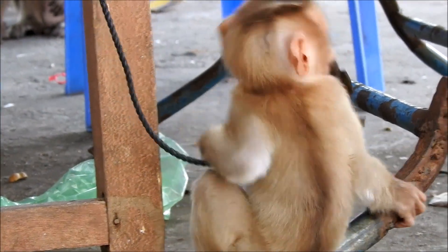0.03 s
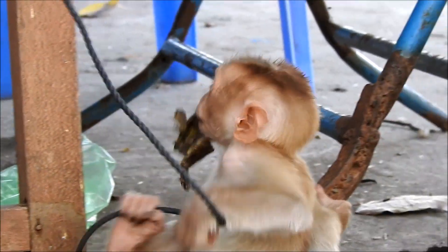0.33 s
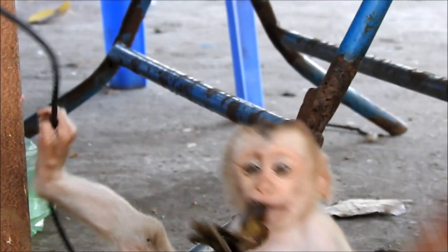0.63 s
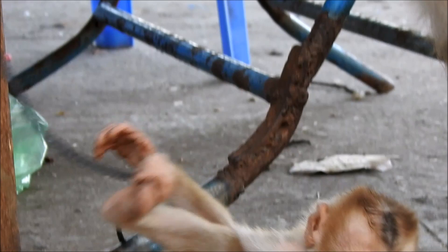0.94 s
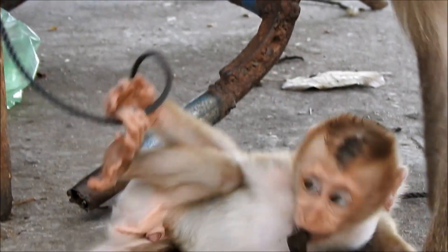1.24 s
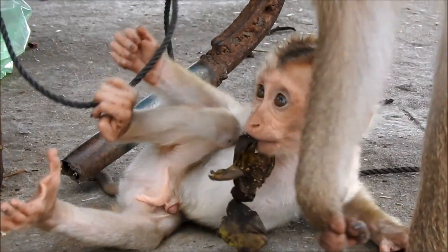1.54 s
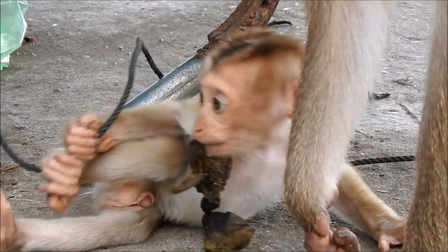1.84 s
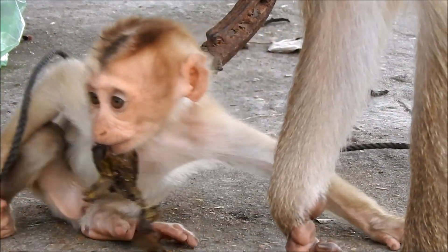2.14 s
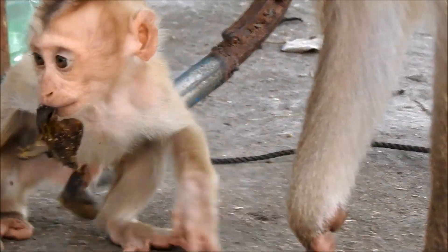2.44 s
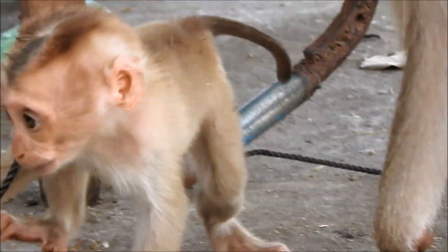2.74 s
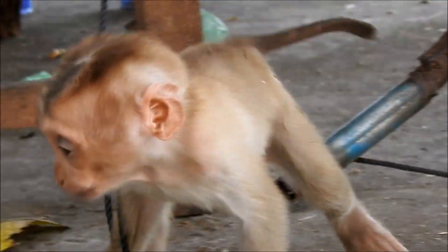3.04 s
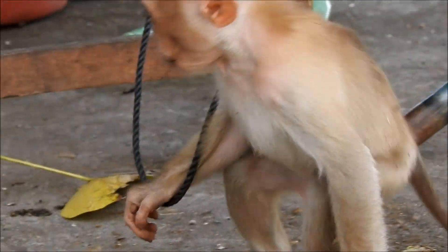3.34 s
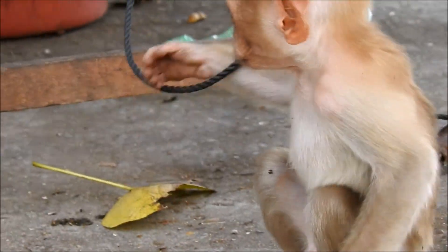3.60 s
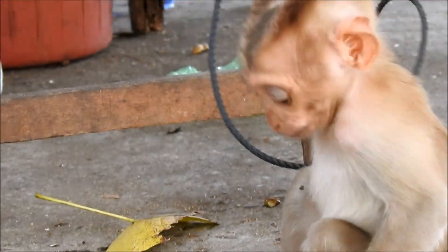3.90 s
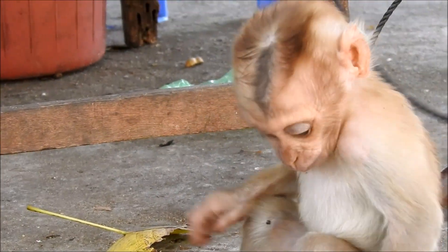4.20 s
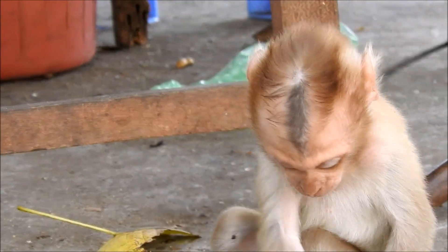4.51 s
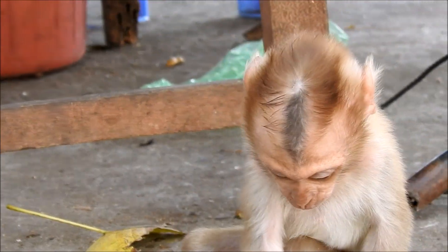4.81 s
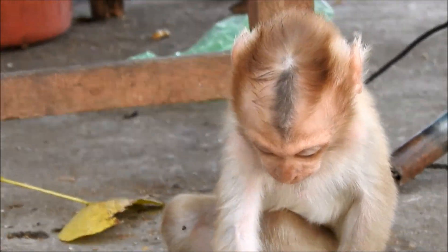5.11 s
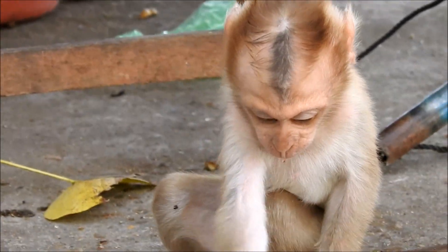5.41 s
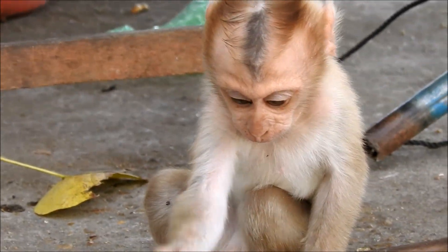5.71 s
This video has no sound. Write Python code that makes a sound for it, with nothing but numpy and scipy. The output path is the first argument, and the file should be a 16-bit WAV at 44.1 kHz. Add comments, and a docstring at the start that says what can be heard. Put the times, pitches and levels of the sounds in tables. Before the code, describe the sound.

Soft bumps, scuffs and ticks in a quiet, hissing yard, with a groaning rub on something hollow and a sharp knock near the end.

```python
"""A quiet yard with a steady high hiss, where a young monkey tumbles with a rope on a concrete floor.
Its contacts make soft bumps, scuffs, clicks and ticks; the rope swishes and grit snaps.
A hollow shell close to the microphone is rubbed: friction rasps, stick-slip groans near 300 Hz.
Late on comes one sharp knock. Sources are built as (mid, side) pairs, then turned to left and right."""
import sys
import numpy as np
from scipy import signal
from scipy.fft import rfft, irfft
from scipy.io import wavfile
from scipy.ndimage import uniform_filter1d

SR = 44100
rng = np.random.default_rng(int(sys.argv[2]) if len(sys.argv) > 2 else 0)


def store_pcm(level_fs):
    """Save levels as 16-bit WAV."""
    pcm = np.round(np.clip(level_fs, -1, 1) * 32767).astype(np.int16)
    wavfile.write(sys.argv[1], SR, np.atleast_2d(pcm).T)


N = 253575
TIME_S = np.arange(N) / SR
FREQ_HZ = np.arange(N // 2 + 1) * SR / N
MID_ONLY = np.array([[1], [0]])

# Levels are relative, ahead of each source's gains.
# soft contacts (time [s], level [dB], pitch [Hz])
BUMP_HITS = [(0.242, -48, 137), (0.634, -43, 179), (1.02, -48.5, 172), (2.251, -37.5, 306),
             (2.363, -37, 285), (2.749, -36.5, 308), (2.984, -34.5, 186), (2.997, -45, 273),
             (3.033, -35.5, 294), (3.318, -41.5, 222), (3.42, -36, 239), (3.442, -38, 323),
             (3.496, -46.5, 209), (3.847, -48, 291), (4.493, -33.5, 249), (4.554, -40.5, 337),
             (5.047, -39.5, 196), (5.071, -41.5, 220)]
# short slides (time [s], length [s], rasp [dB], grit [dB], grit pitch [Hz])
SCUFF_SLIDES = [(0.347, 0.1, -60, -60, 4960), (0.612, .02, -57, -64, 5000),
                (0.635, 0.019, -62, -49.5, 5100), (0.868, .04, -58.5, -66, 5000),
                (2.53, 0.01, -48, -39, 5000), (2.54, 0.043, -52, -36.5, 5700),
                (2.579, 0.021, -63, -47, 6200), (2.595, 0.017, -51.5, -42, 5000),
                (2.713, 0.043, -59, -50.5, 5400), (3.011, 0.07, -73, -50.5, 6800),
                (3.242, 0.048, -60, -49, 5550), (3.418, 0.13, -53.5, -56, 6960),
                (3.834, 0.068, -59, -56, 6200), (4.482, 0.02, -35.5, -40.5, 5500),
                (4.517, 0.011, -44, -43, 5500), (5.02, 0.02, -61, -48, 2990),
                (5.296, 0.021, -54.5, -51.5, 2300)]
# rope passes (time [s], length [s], level [dB])
ROPE_PASSES = [(0.661, 0.068, -49), (2.467, 0.017, -47.5), (2.98, 0.044, -47), (3.415, 0.052, -49),
               (3.804, .06, -55.5), (4.012, 0.041, -48), (4.498, 0.033, -46), (4.54, .026, -52),
               (5.287, .018, -57)]
# hard contacts (time [s], body [dB], edge [dB], pitch [Hz])
CLICK_HITS = [(0.793, -45, -44.5, 1470), (1.606, -47, -58, 1450), (1.63, -42, -48, 1900),
              (1.96, -26, -50, 1095), (1.962, -27, -52, 624), (1.977, -35, -50, 2223),
              (1.986, -28, -54, 660), (2.422, -42, -56, 820), (2.54, -35, -48, 1510),
              (2.602, -43, -54, 850), (2.984, -37.5, -54, 1580), (3.004, -46, -48, 1550),
              (3.321, -40, -56, 640), (3.421, -31.5, -60, 845), (3.847, -42, -48, 1510),
              (4.153, -39, -57, 1370), (4.172, -32.5, -55, 1025), (4.199, -36.5, -62, 1140),
              (4.205, -37.5, -64, 1054), (4.256, -42, -60, 900), (4.29, -38.5, -60, 1000),
              (4.302, -42.5, -64, 1100), (4.3535, -36.5, -54, 1110), (4.485, -29, -32, 866),
              (4.494, -28.5, -35, 834), (4.575, -37, -60, 1480), (4.682, -35, -60, 1040),
              (4.702, -42.5, -62, 900), (4.731, -45, -64, 860), (4.749, -41, -60, 1000),
              (4.769, -40, -46, 1035), (4.808, -35.5, -41, 966), (4.823, -37.5, -40, 1013),
              (5.026, -31, -46, 903), (5.031, -33, -50, 564), (5.05, -39.5, -50, 1010),
              (5.2925, -41.5, -41.5, 2330)]
# rubs on the shell (time [s], length [s], rasp [dB], chirr [dB])
RUB_STROKES = [(1.578, 0.085, -67.5, -62), (1.656, 0.095, -63, -59), (1.732, 0.058, -53.5, -46),
               (1.784, 0.047, -46, -43), (1.835, 0.051, -53.5, -59), (1.885, 0.082, -44.5, -45.5),
               (1.962, 0.042, -45, -58), (2.002, 0.054, -44, -40.5), (2.062, 0.059, -44, -40.5),
               (2.106, 0.034, -46.5, -46), (2.149, .025, -50, -55.5), (2.196, .11, -53.5, -62),
               (2.31, 0.045, -59, -68), (2.371, 0.082, -52, -62), (2.45, .11, -61, -71),
               (2.573, 0.09, -57.5, -65)]
# groan swells (time [s], length [s], peak [dB], pitch [Hz])
GROAN_PULLS = [(1.596, 0.04, -39.5, 303.6), (1.646, 0.043, -43, 300), (1.676, 0.042, -32.5, 296),
               (1.706, 0.044, -41, 296), (1.756, 0.057, -29, 307.6), (1.79, 0.057, -33.5, 303),
               (1.843, 0.067, -46, 289.7), (1.885, 0.032, -35.5, 296.4), (1.911, 0.038, -34, 301.5),
               (1.946, 0.05, -38, 306), (2.001, 0.033, -29.5, 290), (2.025, .032, -28, 296),
               (2.054, 0.035, -33, 308.8), (2.076, .04, -31, 313), (2.111, 0.049, -29.5, 297.3),
               (2.151, 0.037, -43, 286), (2.204, 0.043, -43, 309), (2.278, .055, -46.5, 300.3),
               (2.397, 0.054, -47, 305.5), (2.49, 0.073, -48, 297.6), (2.568, 0.048, -41.5, 298.7),
               (2.612, 0.051, -48, 326)]
# jerks within the rub (time [s], ring [dB], edge [dB], pitch [Hz])
CATCH_HITS = [(1.737, -40, -64, 1470), (1.749, -36, -60, 1455), (1.764, -38, -58, 1484),
              (1.789, -27.5, -37, 1420), (1.808, -32, -43, 1465), (1.829, -33.5, -36, 1410),
              (1.871, -40, -54, 1350), (1.9142, -28, -31, 1410), (1.9356, -25, -29.5, 1353),
              (2.013, -33, -47, 1455), (2.02, -32, -47, 1200), (2.033, -34, -50, 1330),
              (2.044, -34, -49, 1505), (2.091, -36, -43, 1343), (2.117, -33.5, -41, 1395),
              (2.137, -36.5, -44, 1395), (2.385, -39.5, -52, 1565)]
# grit giving way (time [s], level [dB])
SNAP_HITS = [(1.848, -29.5), (1.936, -28), (1.957, -28), (2.277, -37), (2.299, -38), (2.439, -34),
             (2.46, -37), (2.541, -37), (2.553, -35), (2.675, -42), (2.696, -37.5), (2.92, -36),
             (2.959, -35.5), (2.984, -26.5), (3.004, -25), (3.552, -40), (3.593, -37.5), (4.027, -38.5),
             (4.053, -40)]
# spells of ticks (time [s], length [s], rate [1/s], body [dB], edge [dB])
PATTER_SPELLS = [(2.201, .28, 22, -50, -47.5), (4.17, .62, 10, -53, -66)]

# modes of a click and a catch (pitch ratio, level [dB], T60 [s])
CLICK_MODES = [(1, 1, 0.049), (1.52, -8, .04), (2.42, -11.5, .035)]
CATCH_MODES = [(.73, -8, .03), (1, -3, 0.049), (2.191, -14, .03)]
# modes of the glancing touch and the knock (frequency [Hz], level [dB], T60 [s])
GLANCE_MODES = [(1720, -34, .05), (2560, -41, .06), (5490, -36, 0.046), (7040, -33, .03)]
KNOCK_MODES = [(279, -24, 0.06), (316.5, -22.5, 0.054), (340, -42, .3), (572, -20.5, 0.031),
               (710, -37, 0.091), (1180, -31, 0.033), (1680, -40, 0.027), (2110, -30.5, 0.019),
               (7000, -38, 0.019)]
# shell resonances (frequency [Hz], width [Hz], boost [dB])
SHELL_MODES = [(730, 14, 6), (863, 15, 6.5), (1031, 16, 5.5), (1169, 14, 9), (1330, 16, 7.5),
               (1393, 18, 10), (1504, 23, 10), (1564, 19, 6), (1673, 11, 8.5), (2157, 17, 9.5),
               (2518, 21, 11), (3140, 220, 7.5), (5920, 600, 3), (6900, 280, 4)]

# noise spectra (frequency [Hz], level [dB])
AIR_EQ = [(25, -21), (60, -7.5), (110, -7.5), (180, 1.5), (280, -3), (450, -7), (900, -8.5), (1400, -8.5),
          (2000, -8.5), (3000, -8), (3900, -32.5), (6000, -72.5)]
RUMBLE_EQ = [(20, -40), (40, -5.5), (70, 3.5), (110, -2), (190, -1), (350, -20.5), (1000, -72)]
HISS_EQ = [(1760, -8), (3000, -4.5), (3440, -1), (3760, -5), (4260, 1.5), (5530, 2), (6010, 3), (7130, 4),
           (7590, -0.5), (9450, -16), (11400, -26.5), (15500, -33)]
RASP_EQ = [(250, -12.5), (420, -0.5), (580, 4.5), (830, -11), (1050, 1), (1400, -7.5), (1800, -1.5),
           (2700, -10.5), (3150, -14.5), (3600, -30), (5000, -51)]
GRIT_EQ = [(2000, -10), (3700, -2.5), (5200, 3.5), (7200, 3), (8500, -6.5), (10500, -20.5), (15000, -41)]
SWISH_EQ = [(3000, -39), (5500, -5), (6400, 1), (6900, 7.5), (7400, -1), (8500, -7.5), (10000, -19),
            (11500, -25), (15000, -48)]
CLICK_EQ = [(210, -10), (350, 4.5), (542, -0.5), (896, 2.5), (1060, 2), (1290, 0.5), (2400, -1),
            (2970, -4.5), (3790, -15), (4500, -4), (5850, -60), (9900, -120)]
CHIRR_EQ = [(500, -53), (1000, -19.5), (1250, 1.5), (1480, -3), (1700, -6.5), (2100, -35), (2700, -28),
            (3120, -30), (3500, -31), (6000, -53)]
SNAP_EQ = [(500, -18), (1600, -1.5), (2600, -13), (4500, -43), (6000, 5), (7000, 7), (8200, -3),
           (10000, -24), (15000, -34)]
CRUNCH_EQ = [(250, -9), (420, -2), (600, 1), (830, 3), (1000, -10), (1400, -2), (1750, -2), (2150, 1),
             (2450, -14), (3200, -16), (5000, -40)]
KNOCK_EDGE_EQ = [(2000, -1), (3700, -3), (5300, 2), (7000, 6), (8500, -11), (10500, -24), (13000, -23),
                 (15500, -34)]
THUD_EQ = [(40, -21.5), (120, -5), (250, 2), (420, -16), (560, -10.5), (900, -23), (3000, -50)]
THRUM_EQ = [(40, -40), (100, -9.5), (200, 5), (320, 2.5), (440, -9), (600, -8.5), (900, -30),
            (3000, -57)]
KNOCK_TAIL_EQ = [(30, -45), (110, -35), (330, 0), (600, -14), (1500, -18.5), (4000, -34), (7500, -33),
                 (12000, -62)]

# stereo width at the microphone ports (frequency [Hz], side minus mid [dB])
NEAR_WIDTH = [(60, -1), (300, -19.5), (700, -18), (1400, -8), (4400, -9.5), (8000, -1)]
FAR_WIDTH = [(60, 0), (200, -11.5), (600, -13.5), (1400, -10.5), (4400, -8), (8000, -0.5)]
# port imbalance at lean = 1 (frequency [Hz], left minus right [dB])
PORT_TILT = [(400, 0), (1200, 4), (2400, 3), (7000, 4.5), (12000, -0.5)]


def undb(db):
    """Decibels to gain."""
    return 10 ** (np.asarray(db) / 20)


def unit(x):
    """Scale to rms 1."""
    return x / np.sqrt(np.mean(x ** 2))


def response(points):
    """Gain per FFT bin from (Hz, dB) points."""
    hz, db = np.transpose(points)
    return undb(np.interp(np.log(FREQ_HZ + 1), np.log(hz), db))


def colour(x, points):
    """Unit-power spectral shaping; minimum phase keeps attacks sharp."""
    cepstrum = irfft(np.log(unit(response(points))), N)
    cepstrum[1:] *= 2 * (np.arange(1, N) < N / 2)
    return irfft(rfft(x) * np.exp(rfft(cepstrum)), N)


def lowpass(x, hz):
    """Second-order low-pass."""
    return signal.sosfilt(signal.butter(2, hz, fs=SR, output="sos"), x + 1e-18)


def noise():
    """Two independent white noises."""
    return rng.standard_normal((2, N))


def walk(rate_hz):
    """Smoothed random steps, spread near 1."""
    hold = int(SR / rate_hz)
    return 1.37 * uniform_filter1d(rng.standard_normal(N)[np.arange(N) // hold], hold)


def fade(start_s, t60_s, rise_s):
    """Quick rise, exponential fall, peak 1."""
    age_s = np.maximum(TIME_S - start_s, 0)
    shape = (1 - np.exp(-age_s / rise_s)) * np.exp(-np.minimum(np.log(1000) * age_s / t60_s, 50))
    return shape / shape.max()


def arch(start_s, length_s):
    """Half-sine envelope."""
    return np.sin(np.pi * np.clip((TIME_S - start_s) / length_s, 0, 1))


def ring(start_s, hz, t60_s, rise_s):
    """One damped mode, envelope peak 1."""
    first = int(np.ceil(start_s * SR))
    age_s = TIME_S[first:first + int(2 * t60_s * SR)] - start_s
    shape = (1 - np.exp(-age_s / rise_s)) * np.exp(-np.log(1000) * age_s / t60_s)
    tone = shape / shape.max() * np.sin(2 * np.pi * hz * age_s)
    return np.pad(tone, (first, N - first - len(tone)))


def strike(start_s, t60_s, tap_db):
    """Impulse plus dying chatter; the side impulse lags 11 samples."""
    force = noise() * fade(start_s, t60_s, rise_s=0.0002)
    first = int(start_s * SR)
    force[[0, 1], [first, first + 11]] += undb(tap_db)
    return force


def slips(rate_hz, spread_db, slip_s):
    """Friction envelope: random, fast-dying slips, levelled over 26 ms."""
    onsets = rng.random(N) < rate_hz / SR
    sizes = onsets * undb(spread_db * np.minimum(rng.exponential(size=N), 3))
    power = signal.lfilter([1], [1, -np.exp(-2 / (slip_s * SR))], sizes ** 2) + 1e-9
    return np.sqrt(power / np.maximum(uniform_filter1d(power, int(0.026 * SR)), 1e-9))


def yard(air_db=-58.5, rumble_db=-68, hiss_db=-55, rise_db_per_s=0.3868):
    """Distant air, wavering rumble and smooth hiss, all slowly growing."""
    air = undb(air_db + 1.1 * walk(4.46)) * colour(noise(), AIR_EQ)
    rumble = undb(rumble_db + 3.5 * walk(9)) * colour(noise(), RUMBLE_EQ)
    hiss = undb(hiss_db) * colour(noise(), HISS_EQ)
    return undb(rise_db_per_s * TIME_S) * (air + rumble + hiss)


def bumps(tone_db=1, thud_db=-8.5, boom_db=-65, t60_s=0.069, boom_t60_s=0.77):
    """Soft contacts: a few low cycles, a dull thud, a faint deep boom."""
    tone = sum(undb(db) * ring(s, hz, t60_s, rise_s=0.0036) for s, db, hz in BUMP_HITS)
    force = sum(undb(db) * fade(s, 2 * t60_s, rise_s=0.00087) for s, db, _ in BUMP_HITS)
    thud = colour(noise() * force, THUD_EQ)
    boom_envelope = sum(fade(s, boom_t60_s, rise_s=0.036) for s, _, _ in BUMP_HITS)
    boom = colour(noise() * boom_envelope, RUMBLE_EQ)
    return undb(tone_db) * tone * MID_ONLY + undb(thud_db) * thud + undb(boom_db) * boom


def scuffs(treble_db=-2, sing_db=-2, flutter_hz=450):
    """Brief slides that start abruptly and ease off; the grit of each has its own pitch."""
    rasp, grit, sing = 0, 0, 0
    for start_s, length_s, rasp_db, grit_db, hz in SCUFF_SLIDES:
        progress = (TIME_S - start_s) / length_s
        slide = (progress > 0) * np.sqrt(np.clip(1 - progress, 0, 1))
        rasp += undb(rasp_db) * slide
        grit += undb(grit_db) * slide
        sing += undb(grit_db) * slide * np.sin(2 * np.pi * hz * TIME_S)
    grain = slips(rate_hz=660, spread_db=-2, slip_s=0.0054)
    flutter = unit(lowpass(noise(), flutter_hz))  # spreads each pitch into a band
    treble = colour(noise() * grain * grit, GRIT_EQ) + undb(sing_db) * sing * flutter
    return colour(noise() * grain * rasp, RASP_EQ) + undb(treble_db) * treble


def swishes():
    """Rope fibres slide by: a thin hiss that swells and fades."""
    swell = sum(undb(db) * arch(s, length_s) for s, length_s, db in ROPE_PASSES)
    return colour(noise() * swell * slips(rate_hz=1100, spread_db=0, slip_s=0.0042), SWISH_EQ)


def clicks(body_db=-8, edge_db=-4.5, wood_db=-11, tap_db=16, t60_s=0.041, cutoff_ratio=2.86):
    """Small hard contacts: a dull body, a shorter bright edge, a woody ring."""
    body = sum(undb(db) * lowpass(strike(s, t60_s, tap_db), cutoff_ratio * hz)
               for s, db, _, hz in CLICK_HITS)
    edge = sum(undb(db) * strike(s, 0.83 * t60_s, tap_db) for s, _, db, _ in CLICK_HITS)
    wood = sum(undb(db + mode_db) * ring(s, hz * ratio, mode_t60_s, rise_s=0.0003)
               for s, db, _, hz in CLICK_HITS for ratio, mode_db, mode_t60_s in CLICK_MODES)
    impact = undb(body_db) * colour(body, CLICK_EQ) + undb(edge_db) * colour(edge, GRIT_EQ)
    return impact + undb(wood_db) * wood * MID_ONLY


def brushing(start_s=0.95, end_s=1.33, gain_db=-64):
    """A feather-light touch sounds only the chirr, over a trace of it from the outset."""
    touch = np.interp(TIME_S, [start_s, start_s + 0.04, end_s - 0.08, end_s], [0.17, 0.7, 0.17, 0])
    return undb(gain_db + 2 * walk(25)) * touch * colour(noise(), CHIRR_EQ)


def stroke(start_s, length_s, attack_s=0.0089, sag_db_per_s=12, release_t60_s=0.1):
    """Envelope of one rub: grip, sagging hold, release."""
    age_s = np.maximum(TIME_S - start_s, 0)
    fall_db = sag_db_per_s * age_s + 60 * np.maximum(age_s - length_s, 0) / release_t60_s
    return np.minimum(age_s / attack_s, 1) * undb(-np.minimum(fall_db, 200))


def rubbing(rasp_db=-1, chirr_db=-5.5, grit_db=-2, pivot_db=-48, grit_exponent=0.61):
    """Friction on the shell: grainy rasp, nasal chirr, gritty treble; the strongest stroke rules."""
    strokes = [np.outer(undb(dbs), stroke(s, length_s)) for s, length_s, *dbs in RUB_STROKES]
    rasp_gain, chirr_gain = np.max(strokes, axis=0)
    grit_gain = undb(pivot_db) * (rasp_gain / undb(pivot_db)) ** grit_exponent
    grip = unit(undb(2.6 * walk(170)))  # catches and lets go every few ms
    grains = noise() * slips(rate_hz=600, spread_db=1, slip_s=0.012)
    creak = noise() * slips(rate_hz=300, spread_db=1.8, slip_s=0.002)
    crackle = noise() * slips(rate_hz=650, spread_db=2, slip_s=0.004)
    rasp = undb(rasp_db) * colour(grains * grip * rasp_gain, RASP_EQ)
    chirr = undb(chirr_db) * colour(creak * chirr_gain, CHIRR_EQ)
    grit = undb(grit_db) * colour(crackle * grit_gain, GRIT_EQ)
    return rasp + chirr + grit


def groaning(tone_db=-0.5, thrum_db=-13, shake_db=1.7, wander=0.033):
    """Stick-slip locks to the shell's lowest mode; each pull swells at a slightly different pitch."""
    power = sum((undb(db) * arch(s, length_s)) ** 2 for s, length_s, db, _ in GROAN_PULLS)
    start_s, length_s, _, pitch_hz = np.transpose(GROAN_PULLS)
    hz = np.interp(TIME_S, start_s + length_s / 2, pitch_hz) * (1 + wander * walk(150))
    tone = np.sin(2 * np.pi * np.cumsum(hz) / SR) * undb(shake_db * walk(110))
    thrum = colour(noise(), THRUM_EQ)
    return np.sqrt(power) * (undb(tone_db) * tone * MID_ONLY + undb(thrum_db) * thrum)


def catches(crack_db=-14, edge_db=-6, tap_db=15, t60_s=0.042):
    """The rub jerks free: a gritty crack and a hollow ring whose pitch shifts with the grip."""
    hollow = sum(undb(db + mode_db) * ring(s, hz * ratio, mode_t60_s, rise_s=0.0004)
                 for s, db, _, hz in CATCH_HITS for ratio, mode_db, mode_t60_s in CATCH_MODES)
    crack = sum(undb(db) * strike(s, t60_s, tap_db) for s, db, _, _ in CATCH_HITS)
    edge = sum(undb(db) * strike(s, t60_s, tap_db) for s, _, db, _ in CATCH_HITS)
    impact = undb(crack_db) * colour(crack, CLICK_EQ) + undb(edge_db) * colour(edge, GRIT_EQ)
    return impact + hollow * MID_ONLY


def snaps(gain_db=-10, tap_db=17, t60_s=0.023):
    """Grit gives way: a sharp tick with a thin, bright ring."""
    force = sum(undb(db) * strike(s, t60_s, tap_db) for s, db in SNAP_HITS)
    return undb(gain_db) * colour(force, SNAP_EQ)


def patter(body_db=-7, edge_db=-5, spread_db=5, tick_s=0.0057):
    """Faint random ticks as the monkey scuffles and fidgets."""
    chance = rng.random(N)
    sizes = undb(spread_db * np.clip(rng.standard_normal(N), -2, 2))
    hits = 0
    for start_s, length_s, rate_hz, *dbs in PATTER_SPELLS:
        active = (TIME_S > start_s) & (TIME_S < start_s + length_s)
        hits += np.outer(undb(dbs), sizes * (chance < rate_hz / SR) * active)
    power = signal.lfilter([1], [1, -np.exp(-2 / (tick_s * SR))], hits ** 2 + 1e-18)
    body_gain, edge_gain = np.sqrt(power)
    body = undb(body_db) * colour(noise() * body_gain, CLICK_EQ)
    edge = undb(edge_db) * colour(noise() * edge_gain, GRIT_EQ)
    return body + edge


def knock(glance_s=4.4828, blow_s=4.528, crunch_db=-28, edge_db=-32.5, tail_db=-41):
    """A glancing touch rings brightly; a hard blow crunches in, rings the shell, leaves a dull tail."""
    glance = sum(undb(db) * ring(glance_s, hz, t60_s, rise_s=0.00045) for hz, db, t60_s in GLANCE_MODES)
    modes = sum(undb(db) * ring(blow_s, hz, t60_s, rise_s=0.8 / hz) for hz, db, t60_s in KNOCK_MODES)
    crunch = colour(noise() * fade(blow_s - 0.003, t60_s=0.027, rise_s=0.0012), CRUNCH_EQ)
    edge = colour(strike(blow_s - 0.0005, t60_s=0.018, tap_db=17), KNOCK_EDGE_EQ)
    tail = colour(noise() * fade(blow_s, t60_s=0.35, rise_s=0.0057), KNOCK_TAIL_EQ)
    impact = undb(crunch_db) * crunch + undb(edge_db) * edge + undb(tail_db) * tail
    return impact + (glance + modes) * MID_ONLY


def shell(x):
    """The hollow shell rings briefly at its resonances."""
    gain = 1 + sum((undb(db) - 1) / (1 + 2j * (FREQ_HZ - hz) / width_hz)
                   for hz, width_hz, db in SHELL_MODES)
    return irfft(rfft(x) * gain, N)


def ports(pair, width, lean):
    """Two microphone ports: (mid, side) to (left, right); lean tilts the treble left."""
    mid, side = rfft(pair)
    side = side * response(width)
    tilt = response(PORT_TILT) ** (lean / 2)
    left_right = np.array([(mid + side) * tilt, (mid - side) / tilt])
    return irfft(left_right * 2 / (tilt + 1 / tilt), N)


def scene():
    """Near contacts over the quiet yard; the clicks lie further left."""
    contacts = brushing() + groaning() + rubbing() + bumps() + snaps() + scuffs() + patter()
    near = shell(contacts) + catches() + swishes() + knock()
    return (ports(near, NEAR_WIDTH, lean=0.98)
            + ports(clicks(), NEAR_WIDTH, lean=1.84)
            + ports(yard(), FAR_WIDTH, lean=0.44))


def record(dry, low_hz=40, top_hz=15700):
    """The microphone sheds the deepest bass; a steep low-pass cuts the top."""
    trimmed = signal.sosfilt(signal.butter(2, low_hz, "high", fs=SR, output="sos"), dry)
    return signal.sosfilt(signal.ellip(10, 0.2, 70, top_hz, fs=SR, output="sos"), trimmed)


dry = scene()
out = record(dry)
store_pcm(out)
```